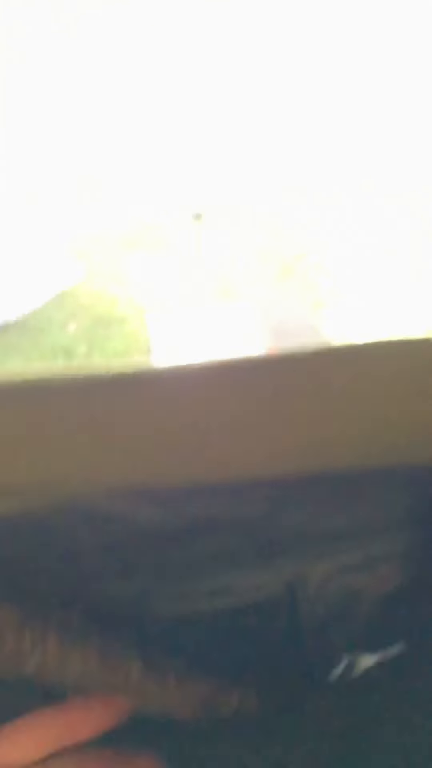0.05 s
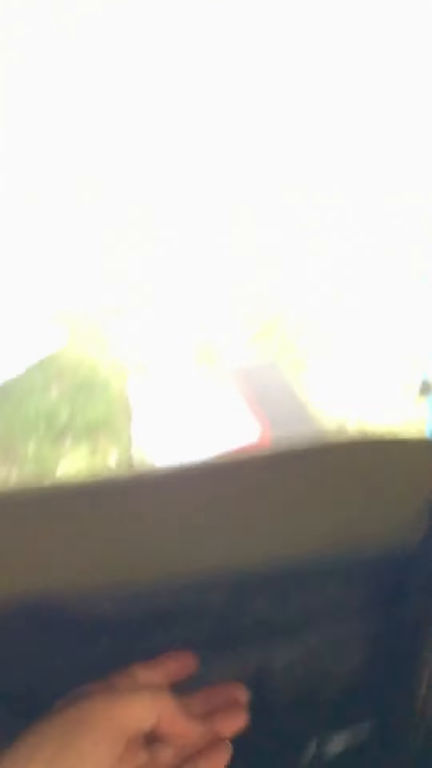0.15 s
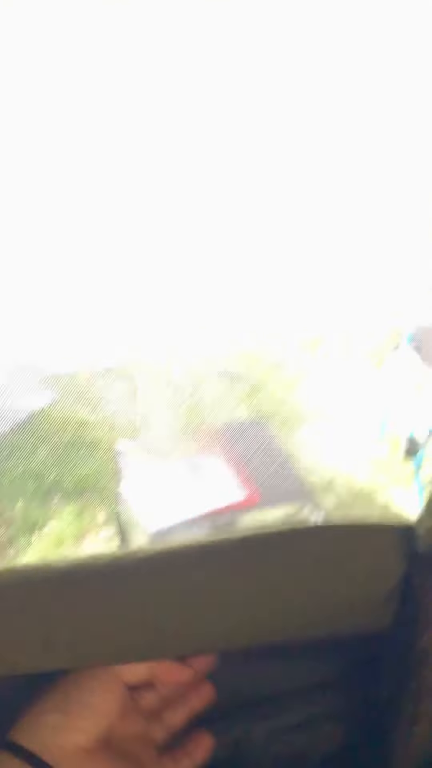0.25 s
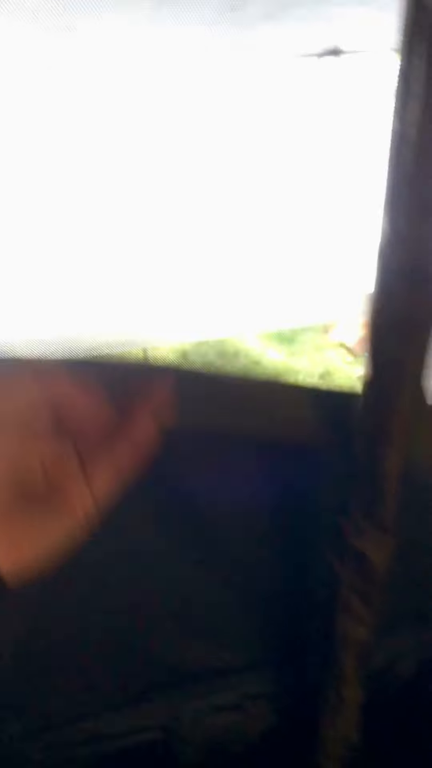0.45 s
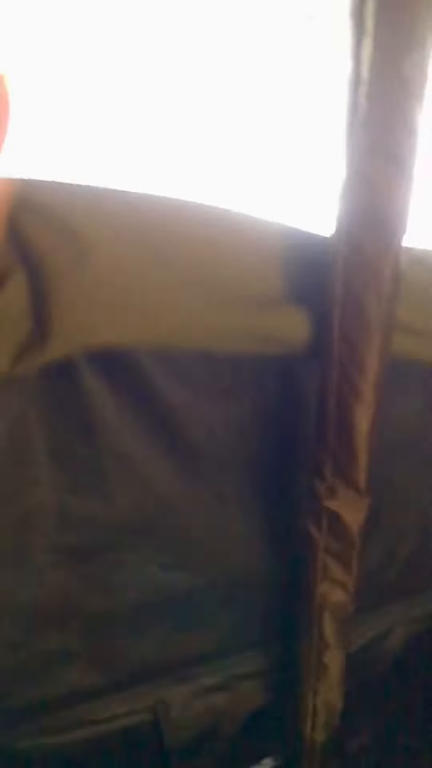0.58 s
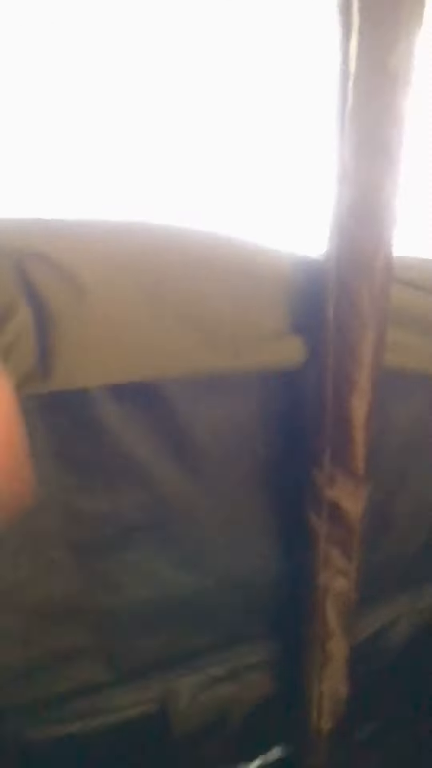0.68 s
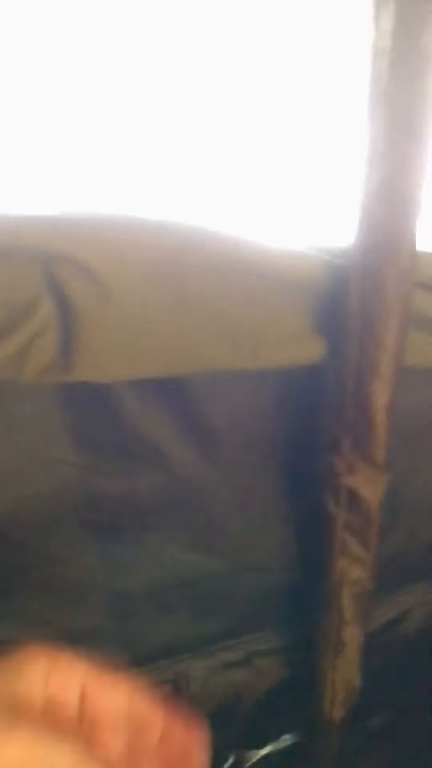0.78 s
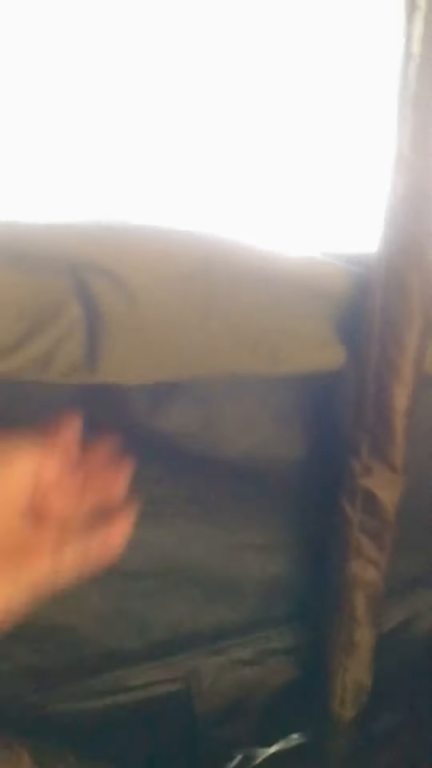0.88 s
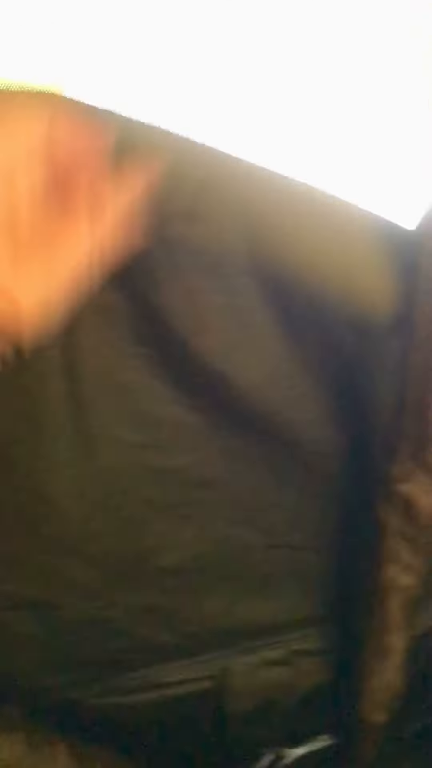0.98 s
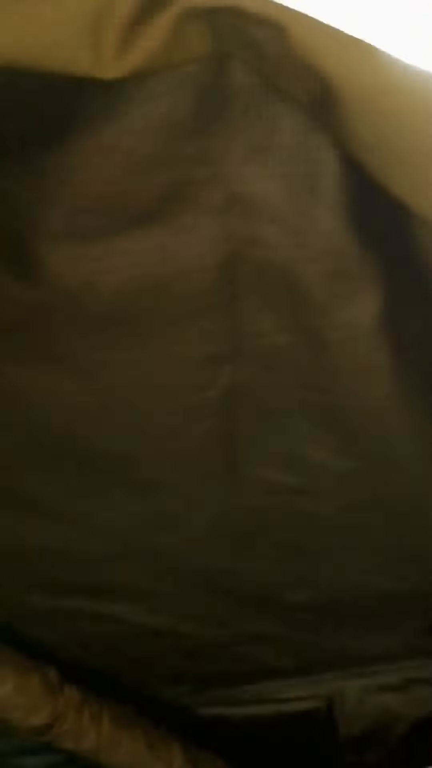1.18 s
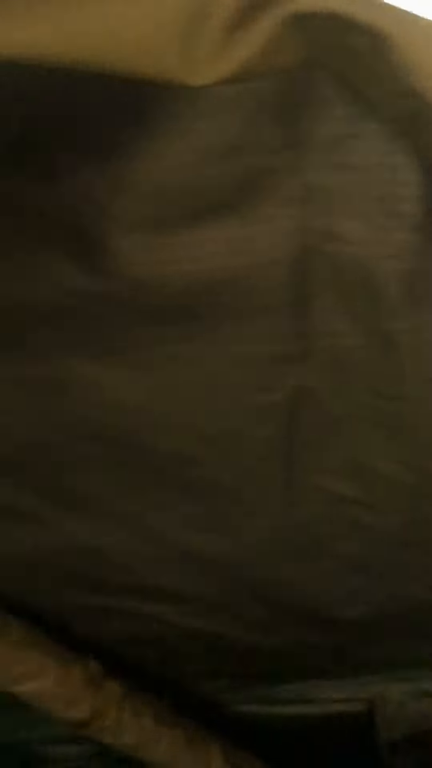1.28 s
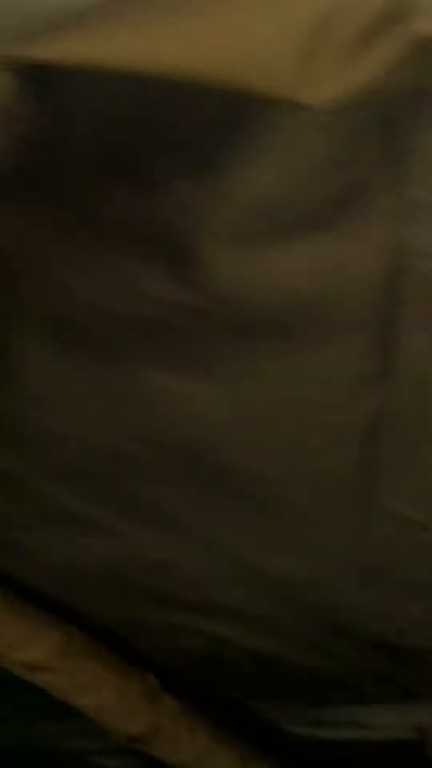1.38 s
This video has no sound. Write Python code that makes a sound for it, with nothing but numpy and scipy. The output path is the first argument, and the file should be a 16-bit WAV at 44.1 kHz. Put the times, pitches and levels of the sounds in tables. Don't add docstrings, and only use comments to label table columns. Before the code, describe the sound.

A tent window zipper closes in two quick strokes, close up, over faint outdoor air. From 0.1 s coated cloth slides softly, growing into a bright hiss that ends in dense snaps and knocks around 0.43 s. Slack cloth settles quietly. At 0.75 s a low air thump starts a louder rasp, knocking hard near 0.88 s, stopping at 1.02 s. Faint rustle, a soft flap at 1.2 s, then tiny ticks and metal rattle from 1.35 s.

```python
import sys
import numpy as np
from scipy import signal
from scipy.fft import rfft, irfft
from scipy.io import wavfile
from scipy.ndimage import uniform_filter1d

SR = 44100
rng = np.random.default_rng(int(sys.argv[2]) if len(sys.argv) > 2 else 0)


def gain_from_db(level_db):
    decades = np.asarray(level_db, float) / 20
    return 10 ** decades


def master_out(mix):
    frames = np.transpose(np.atleast_2d(mix))
    ceiling = np.clip(frames, -1, 1)
    pcm = np.round(ceiling * 32767).astype(np.int16)
    wavfile.write(sys.argv[1], SR, pcm)


N = 63945

# (time [s], sliding effort [dB], tautness over effort [dB])
STROKES = [
    [(.096, -52, -5), (.108, -48, -4.5), (.12, -39, -7.5), (.144, -36, -13), (.196, -40, 0),
     (.23, -30.5, -9), (.35, -28, -5.5), (.375, -26.5, -2.5), (.432, -26.5, -4.5), (.445, -53, 3)],
    [(.749, -44.5, -9), (.764, -31, -15), (.81, -24.5, -16.5), (.864, -28, -6.5), (.89, -23, -8.5),
     (.956, -30.5, -6.5), (.985, -30.5, -16), (1.01, -28, -8), (1.016, -36, -11)],
]
# (time [s], level [dB])
SETTLING = [(.43, -27.5), (.472, -42), (.6, -41), (.738, -57), (1.015, -36.5), (1.12, -42.5), (1.26, -52),
            (1.352, -53), (1.357, -47.5), (1.388, -42.5), (1.45, -51)]
# (frequency [Hz], level [dB])
SLIDE_COLOUR = [(1470, -52), (2500, -10), (3370, -7.5), (4020, -12), (5420, -2.5), (7710, -7), (9630, -2.5),
                (13800, -0.5), (15600, -6)]
# (frequency [Hz], level [dB])
PANEL_COLOUR = [(120, -19), (200, -2.5), (292, -23.5), (449, -12.5), (520, -9.5), (880, 0), (1030, -1.5),
                (2350, -2), (5000, -6), (6500, -47), (11000, -120)]
# (frequency [Hz], level [dB])
SLACK_COLOUR = [(300, -9), (600, -9.5), (1140, -1), (2450, -5), (4000, -6), (7000, -8.5), (12800, -3),
                (15600, -4.5)]
# (time [s], level [dB], length [ms], brightness [dB per octave])
CREASE_SNAPS = [(.0949, -36, .3, -2), (.3678, -10, .4, 9), (.3695, -13, 4.5, 9), (.3774, -13, 2, 9),
                (.3815, -11, .7, 9), (.3968, -11, 1.3, 10), (.4027, -14, .6, 9), (.4064, -11, .7, 9),
                (.4158, -4, .45, 20), (.4266, -10, .3, 5), (.4277, -9, .3, 5), (.429, -2.5, .35, 7),
                (.4297, -7, .4, 3), (.4302, -7, .8, 2), (.431, -2.5, .5, 3), (.4317, -10, .8, 8),
                (.433, -22, 7, -1), (.4905, -34, .4, -4), (.7487, -29, .5, -1), (.7535, -25, 1.5, 0),
                (.9652, -15, .5, 7), (.9668, -10, 1.6, 6), (.9692, -11, .7, 3), (.9978, -20, .8, 9),
                (1.0003, -19, 1, 12), (1.003, -18, 1.8, 12), (1.0088, -16, 1.8, 6), (1.0125, -14, .3, -5),
                (1.0148, -27, .8, 2), (1.343, -45, .4, -1), (1.3549, -29.5, .3, -2), (1.3558, -41, 2, -1),
                (.5885, -32, 1.5, -5), (.8821, -20, .5, -4), (.8968, -18, 1.5, -1), (1.376, -37, 2, -4),
                (1.388, -34, 3.5, 4), (1.4448, -40, .4, 3)]
# (time [s], level [dB], pitch [Hz], length [ms])
KNOCK_HITS = [(0.1578, -38.5, 930, 4.8), (.3256, -17, 700, 2.05), (.3945, -22, 2420, 5.7),
              (.3285, -30, 940, 4.5), (.3315, -26, 1225, 13), (.3325, -30, 2320, 4),
              (.37, -26.5, 1770, 6.8), (0.3958, -21.5, 870, 5.3), (0.4312, -14, 2370, 2.4),
              (.4931, -40, 9800, 2), (.4312, -15, 1120, 2.46), (0.5885, -28, 900, 1.7),
              (.591, -30, 1090, 4.9), (0.7489, -29.5, 890, 2.1), (0.7503, -33.5, 347, 4.6),
              (0.7529, -25.5, 1160, 1.1), (0.7541, -21, 820, 1.4), (.8345, -26.5, 800, 3.1),
              (0.882, -7.5, 1176, 2), (0.8848, -20.5, 1750, 2.1), (0.887, -17.5, 1150, 2.6),
              (0.8936, -11, 1610, 1.25), (0.8966, -9, 1120, 1.27), (0.8982, -13.5, 1330, 2.4),
              (.901, -22.5, 1250, 6.5), (.906, -25, 1028, 14), (.923, -24.5, 965, 4.7),
              (.956, -25, 1630, 3.1), (.969, -25, 2230, 3), (.969, -14.5, 6470, 1.7),
              (1.0119, -13, 2700, 1.02), (1.0129, -22, 940, 2.74), (.4905, -41, 543, 9.6),
              (1.3549, -34.5, 1420, 1.6), (1.363, -39, 1710, 4.6), (1.374, -45.5, 1090, 6.2),
              (1.401, -47, 1760, 9)]
# (time [s], level [dB], pitch [Hz], t60 [s])
AIR_PUSHES = [(.098, -47, 110, 0.034), (0.107, -42.5, 80, 0.05), (0.271, -43, 58.6, 0.14),
              (0.36, -36, 91, 0.1), (0.407, -30.5, 59.6, 0.14), (0.4309, -29, 101, 0.078),
              (0.468, -37.5, 65.4, 0.091), (.508, -41, 74.6, 0.095), (0.7566, -17, 73.6, 0.08),
              (0.801, -31.5, 104, 0.095), (0.834, -28, 93, 0.06), (0.881, -26, 94.5, 0.063),
              (0.912, -32, 58.3, 0.069), (.975, -39, 55.3, 0.1), (1.197, -50, 110, 0.027),
              (1.2085, -33, 84, 0.037), (1.2228, -38, 82, 0.24), (1.358, -41.5, 95, 0.028),
              (1.369, -45.5, 110, 0.067), (1.38, -46, 90, .05), (1.401, -48, 120, 0.043)]
# (frequency [Hz], level [dB])
RUMBLE_COLOUR = [(15, -35), (25, 0), (80, 1), (113, -2), (211, -6), (257, -10), (500, -13.5), (650, -34),
                 (1100, -120)]
# (time [s], level [dB], rattle length [s])
JINGLE_HITS = [
    (1.376, -42, .011),
    (1.388, -37.5, .006),
    (1.43, -47.5, .016),
]
# (frequency [Hz], level [dB], t60 [s])
PULLER_MODES = [
    (12140, 0, .03),
    (5210, -9.5, 0.021),
]
# (start [s], end [s], level [dB])
DISTANT_CREAKS = [
    (0.62, 0.752, -56.5),
    (1.24, 1.363, -56.5),
]
# (frequency [Hz], level [dB])
FLOOR_COLOUR = [(15, -27), (25, 5.5), (306, -10), (923, -16), (2430, -11.5), (5030, -24), (8170, -17.5),
                (15600, -15.5)]
# (frequency [Hz], width [Hz], level [dB])
PORT_DIPS = [
    (4925, 346, -4.5),
    (10470, 210, -7),
]

TREBLE_EDGE_HZ = 15720


def evened(x):
    return x / np.sqrt(np.mean(x ** 2) + 1e-20)


def coloured(x, points):
    f, db = np.transpose(points)
    hz = np.fft.rfftfreq(len(x), 1 / SR)
    gain = gain_from_db(np.interp(np.log(hz + 1), np.log(f + 1), db, left=-40))
    return evened(irfft(rfft(x) * gain, len(x)))


def patchy(x, patch_db):
    z = signal.stft(x, nperseg=256, noverlap=192)[2]
    patches = uniform_filter1d(rng.standard_normal(z.shape), size=7, axis=0)
    patches = evened(uniform_filter1d(patches, size=14, axis=1))
    y = signal.istft(z * gain_from_db(patch_db * patches), nperseg=256, noverlap=192)[1]
    return evened(y[:len(x)])


def add(mix, s, sound):
    part = mix[round(s * SR):][:len(sound)]
    part += sound[:len(part)]


def grains():
    grains_per_s, spread_db = 9000, 1.3
    size = gain_from_db(spread_db * np.minimum(rng.exponential(1, N), 3))
    slips = rng.random(N) < grains_per_s / SR
    return size * rng.standard_normal(N) * (.5 + slips)


def cloth():
    t, effort, taut = np.arange(N) / SR, np.zeros(N), np.zeros(N)
    for stroke in STROKES:
        s, effort_db, taut_db = np.transpose(stroke)
        effort += gain_from_db(np.interp(t, s, effort_db, left=-99, right=-99))
        taut += gain_from_db(np.interp(t, s, effort_db + taut_db, left=-99, right=-99))
    slack = gain_from_db(np.interp(t, *np.transpose(SETTLING), left=-99))
    fizz = effort * patchy(coloured(grains(), SLIDE_COLOUR), 1.5)
    hum = taut * patchy(coloured(grains(), PANEL_COLOUR), 2.3)
    whisper = slack * patchy(coloured(grains(), SLACK_COLOUR), 1.0)
    rumble_db, follow = -48.5, 0.69
    drag = uniform_filter1d((effort + slack) / 0.021, size=900) ** follow
    air = gain_from_db(rumble_db) * drag * coloured(rng.standard_normal(N), RUMBLE_COLOUR)
    return fizz + hum + whisper, air


def snaps():
    out, ms, hz = np.zeros(N), np.arange(512) / SR * 1000, np.fft.rfftfreq(512, 1 / SR)
    lead = 64
    for s, db, length, bright in CREASE_SNAPS:
        burst = rng.standard_normal(512) * np.minimum(ms / .15, 1) * np.exp(-(ms / length) ** 2)
        burst[6] += 6 * np.exp(-2 * length)
        tilt = gain_from_db(bright * np.log2((hz + 800) / 10000))
        tilt = tilt * (hz < TREBLE_EDGE_HZ) * hz / (hz + 900)
        burst = irfft(rfft(np.roll(burst, lead)) * tilt)
        add(out, s - lead / SR, gain_from_db(db) * burst / abs(burst).max())
    return out


def knocks():
    out, ms = np.zeros(N), np.arange(1500) / SR * 1000
    for s, db, hz, length in KNOCK_HITS:
        band = [0.43 * hz, min(2.4 * hz, SR / 2.2)]
        noise = rng.standard_normal(1500)
        puff = evened(signal.lfilter(*signal.butter(2, band, "band", fs=SR), noise))
        ring = np.sin(2 * np.pi * hz * ms / 1000)
        u = ms / max(length, .5)
        decay = np.exp(-2.5 * u ** 2) + 0.042 * np.exp(-u / 2.0)
        add(out, s, gain_from_db(db) * (ring + .22 * puff) * np.minimum(ms / .5, 1) * decay)
    return out


def pushes():
    out, t = np.zeros(N), np.arange(10000) / SR
    sag, rise_s = 0.57, 0.0024
    bend = 1 + sag * (2 * np.exp(-t / 0.015) - 1)
    for s, db, hz, t60 in AIR_PUSHES:
        turns = np.cumsum(hz * bend) / SR
        level = gain_from_db(db - 60 * t / t60) * (1 - np.exp(-t / rise_s)) * 2
        add(out, s, -level * np.sin(2 * np.pi * turns))
    return out


def puller():
    drive, t = np.zeros(N), np.arange(3000) / SR
    for s, db, length in JINGLE_HITS:
        release = np.exp(-np.maximum(t - length, 0) / 0.0028)
        add(drive, s, gain_from_db(db) * (1 - np.exp(-t / .001)) * release)
    t, ring = np.arange(N) / SR, np.zeros(N)
    for hz, db, t60 in PULLER_MODES:
        wobble = 0.029 / t60 * np.sin(400 * t)
        ring += gain_from_db(db) * np.sin(2 * np.pi * hz * t + wobble)
    return drive * ring


def creak():
    t, level = np.arange(N) / SR, np.zeros(N)
    centre_hz, width_hz, throbs_per_s = 1820, 540, 46
    band = [centre_hz - width_hz / 2, centre_hz + width_hz / 2]
    noise = rng.standard_normal(N)
    noise = evened(signal.lfilter(*signal.butter(2, band, "band", fs=SR), noise))
    for start, end, db in DISTANT_CREAKS:
        level += gain_from_db(db) * np.sin(np.pi * np.clip((t - start) / (end - start), 0, 1)) ** .5
    return level * noise * (1 + 0.27 * np.sin(2 * np.pi * throbs_per_s * t))


def tent(x):
    level_db, t60_s = -12.5, 0.24
    t = np.arange(6000) / SR
    tail = rng.standard_normal(6000) * gain_from_db(-60 * t / t60_s) * (t > .002)
    return gain_from_db(level_db) * signal.fftconvolve(x, tail / np.linalg.norm(tail))[:N]


def outdoor_floor():
    return gain_from_db(-56.5) * patchy(coloured(rng.standard_normal(N), FLOOR_COLOUR), 2.7)


def scene():
    slide, air = cloth()
    near = snaps() + knocks() + puller()
    mix = slide + near + tent(near) + air + pushes() + creak() + outdoor_floor()
    return mix[None]


def top_cut(x):
    return signal.sosfilt(signal.butter(12, 16820, fs=SR, output="sos"), x)


def record(dry):
    low_cut_hz = 25.7
    hz = np.fft.rfftfreq(N, 1 / SR)
    dips = gain_from_db(sum(db * np.exp(-((hz - f) / w) ** 2) for f, w, db in PORT_DIPS))
    bass = hz ** 2 / (hz ** 2 + low_cut_hz ** 2)
    heard = irfft(rfft(dry) * dips * bass, N)
    edge = signal.firwin(1023, TREBLE_EDGE_HZ, window=("kaiser", 7), fs=SR)[None]
    return top_cut(signal.oaconvolve(heard, edge, "same"))


dry = scene()
out = record(dry)
master_out(out)
```